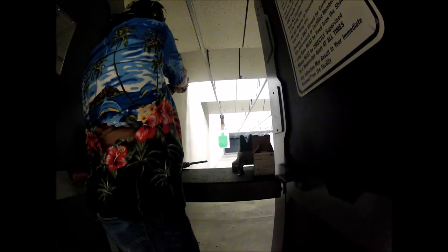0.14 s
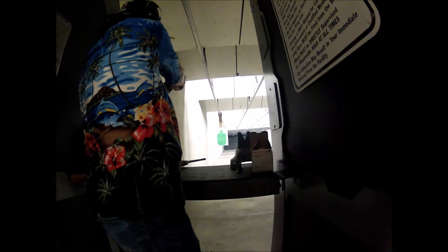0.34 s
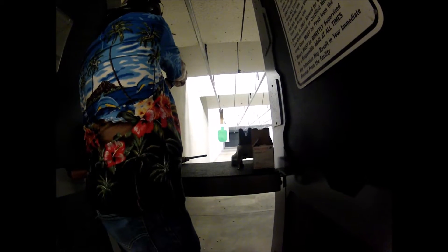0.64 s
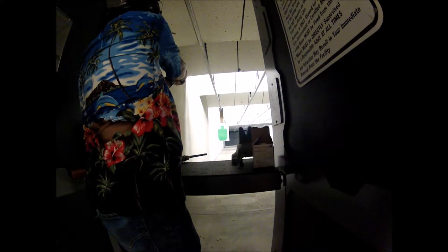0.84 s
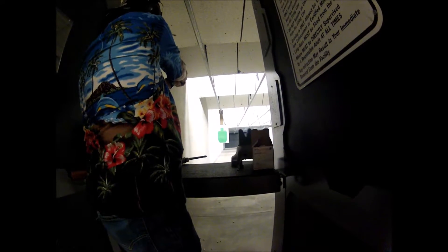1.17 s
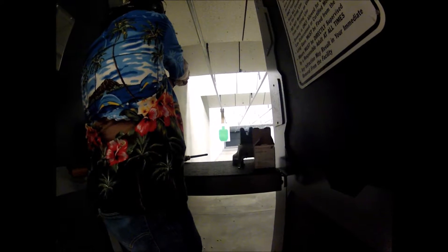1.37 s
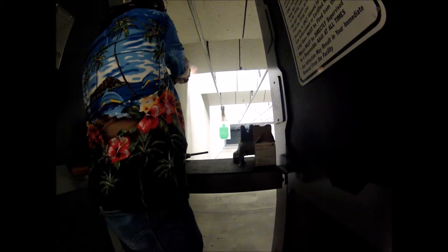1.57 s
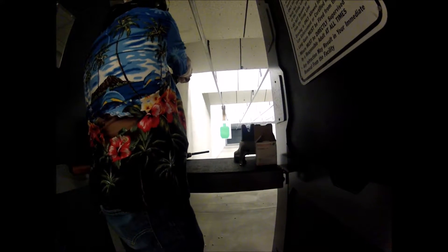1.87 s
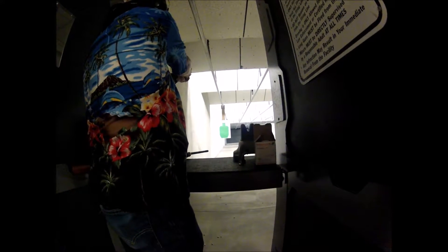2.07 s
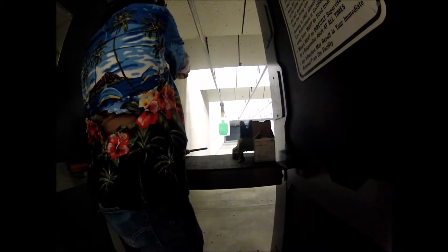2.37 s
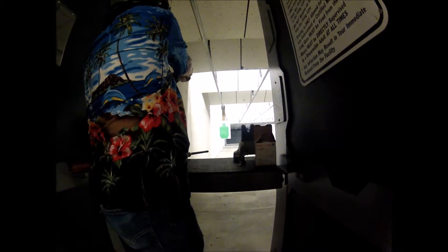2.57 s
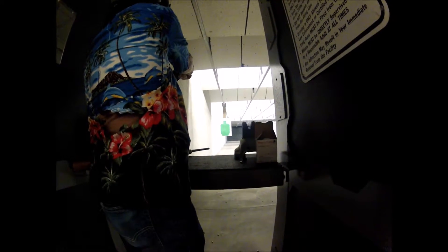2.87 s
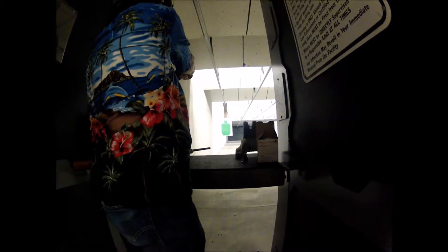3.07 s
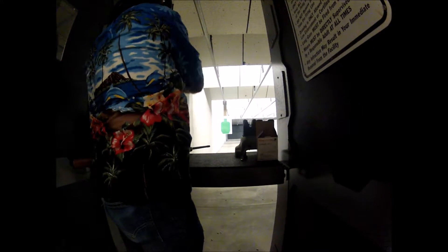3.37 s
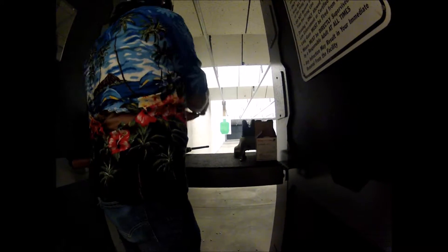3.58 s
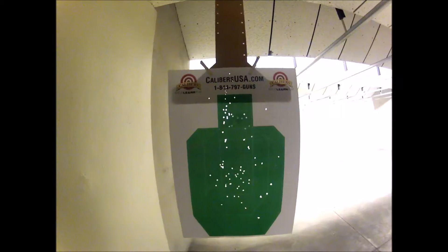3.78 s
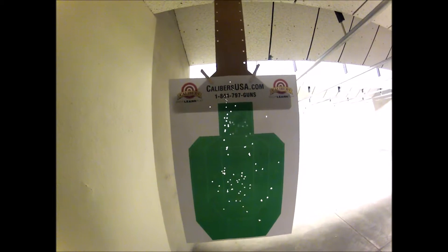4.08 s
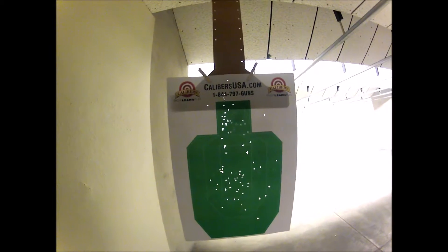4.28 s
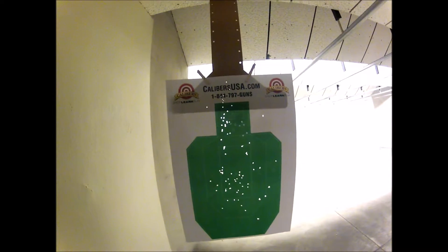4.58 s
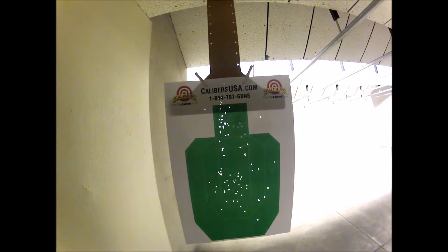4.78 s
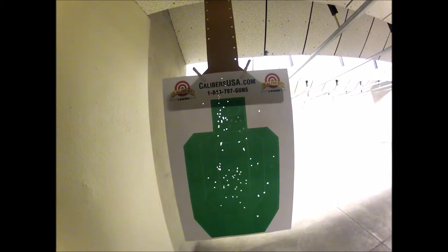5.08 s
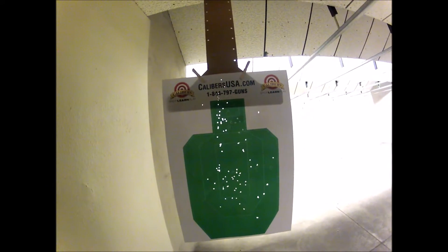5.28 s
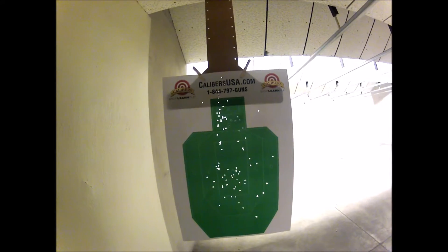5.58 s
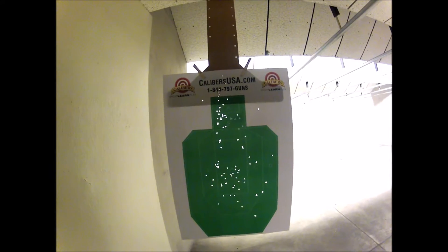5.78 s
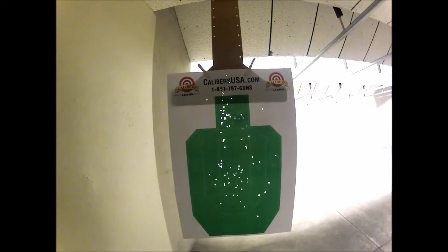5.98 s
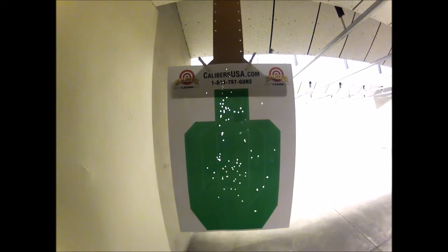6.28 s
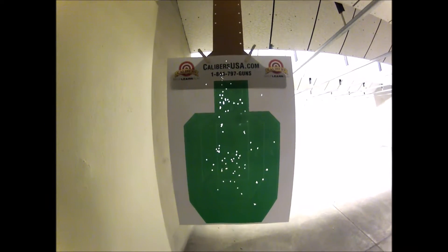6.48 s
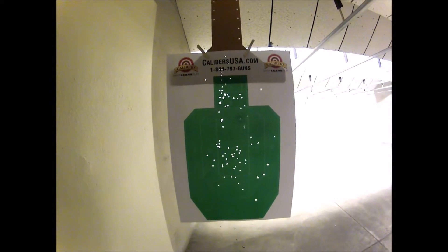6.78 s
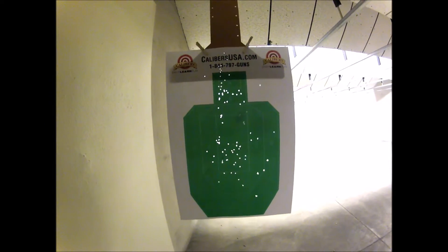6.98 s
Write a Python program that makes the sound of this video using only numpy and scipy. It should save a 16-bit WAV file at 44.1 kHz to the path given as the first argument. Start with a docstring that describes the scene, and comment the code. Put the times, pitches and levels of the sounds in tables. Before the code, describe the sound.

The sound opens on the fading echo of a gunshot in an indoor range. A small-calibre gun fires close by in a booth: four quick shots at about 0.4, 0.6, 0.9 and 1.1 seconds, one at 1.6, then four more between 2.1 and 2.7. Each is a sharp, gritty crack that overloads the microphone; the level ducks, then the hall's ringing echo swells back. A light, high metal clink comes at 3.3 seconds. At about 3.8 the echo cuts off as the listening position jumps far down the lane. The ventilation, present throughout, is left alone: a low rumble and fan hum, with a faint hiss that swells twice between 5 and 5.7 seconds. A fainter clink sounds just after 6. Two distant shots follow at 6.2 and 6.8 seconds, the second louder, each a long, dull roar with a booming echo.

```python
"""Gunshots at an indoor range

A rimfire gun fires nine shots in a booth, over the tail of an earlier one. Each overloads a small
camera, which turns itself down, then lets the hall's echo swell back. Then the scene jumps far down
the lane, where two shots arrive as long, dull roars. Ventilation runs throughout; metal clinks twice."""
import sys
import numpy as np
from scipy import signal
from scipy.fft import rfft, irfft
from scipy.io import wavfile

SR = 44100
rng = np.random.default_rng(int(sys.argv[2]) if len(sys.argv) > 2 else 0)


def dump_mix(stems):
    """Bounce the given channels to the path in sys.argv[1] as a 16-bit WAV at rate SR."""
    frames = np.atleast_2d(stems).T  # one column per channel
    limited = np.clip(frames, -1, 1)  # hard clip at full scale
    pcm = np.round(limited * 32767).astype(np.int16)
    wavfile.write(sys.argv[1], SR, pcm)


N = 314852
T = np.arange(N) / SR
FREQS = np.arange(N // 2 + 1) * SR / N


def from_db(db):
    """Turn decibels into a number to multiply by."""
    return 10 ** (np.asarray(db) / 20)


def delayed(x, s):
    """The sound x started at s seconds, which may be negative."""
    return np.interp(np.arange(N) - round(s * SR), np.arange(N), x, left=0, right=0)


def rising(s):
    """A soft start that takes about s seconds."""
    return 1 - np.exp(-(T / s) ** 2)


def dying(t60):
    """A fade that falls 60 dB in t60 seconds."""
    return np.exp(-np.log(1000) * T / t60)


def hump(centre_s, width_s):
    """A bell-shaped rise and fall of height 1."""
    return np.exp(-((T - centre_s) / width_s) ** 2)


def low_pass(x, hz, order):
    """Soften everything above hz; a higher order cuts more sharply."""
    return irfft(rfft(x) / np.sqrt(1 + (FREQS / hz) ** (2 * order)), N)


def drift(rate_hz):
    """A slow random wander with a spread of 1."""
    slow = low_pass(rng.standard_normal(N), rate_hz, order=2)
    return slow / slow.std()


def noise(colour, resonances=()):
    """Noise of strength 1; its colour says how loud each pitch is, and resonances add bumps or dips."""
    hz, db = np.transpose(colour)
    octave = np.log2(FREQS + 1)
    octaves_outside = np.abs(octave - np.clip(octave, np.log2(hz[0]), np.log2(hz[-1])))
    shape_db = np.interp(octave, np.log2(hz), db) - 40 * octaves_outside
    for centre, width, lift in resonances:
        shape_db += lift / (1 + (2 * (FREQS - centre) / width) ** 2)
    x = irfft(rfft(rng.standard_normal(N)) * from_db(shape_db), N)
    return x / x.std()


def struck(tones):
    """Fading pure tones, all started by one blow."""
    return sum(from_db(db) * dying(t60) * np.sin(2 * np.pi * hz * T) for hz, db, t60 in tones)


# tones of the booth's side walls: f/Hz, level/dB, time to fade 60 dB/s
PARTITION_TONES = [(351, -0.5, 0.52), (459, 15, 0.038), (581.5, 11.5, 0.13), (1290, 7, 0.035),
                   (2162, 16.5, 0.029), (3220, 4, 0.044)]
def muzzle_blast(hz=561, rise_s=0.0014, t60=0.021, blast_db=24.5):
    """The pressure wave slaps between the booth's side walls for a few cycles and sets them ringing."""
    wave = from_db(blast_db) * rising(rise_s) * dying(t60) * np.sin(2 * np.pi * hz * T)
    walls = rising(0.002) * struck(PARTITION_TONES)
    return -(wave + walls)


def low_thump(peak_s, thump_db):
    """A short, low thump comes with each overloaded shot."""
    return -from_db(thump_db) * (T / peak_s * np.exp(1 - T / peak_s)) ** 2


def reflections(early_db, early_t60, hall_db, hall_t60, build_s):
    """A room's loudness over time: the booth's echoes die fast, the hall's slowly."""
    early = from_db(early_db) * dying(early_t60)
    hall = from_db(hall_db) * dying(hall_t60)
    return rising(build_s) * np.hypot(early, hall)   # their powers add


# tones that ring longest in the booth: f/Hz, level/dB
LINGERING_TONES = [(575, 1.5), (657, 1), (813, -3), (931, -5.5), (1147, -12), (1464, -10), (1798, -10.5),
                   (2051, -11), (2121, -11), (2326, -17), (2611, -10.5), (2950, -11)]
def booth_ring(ring_db, t60, width_hz):
    """A few narrow bands of sound outlast the other echoes."""
    power = sum(from_db(2 * db) / (1 + (2 * (FREQS - hz) / width_hz) ** 4) for hz, db in LINGERING_TONES)
    ring = irfft(rfft(rng.standard_normal(N)) * np.sqrt(power), N)
    return from_db(ring_db) * dying(t60) * ring / ring.std()


# colours of the hall's dull and bright echoes at the booth: f/Hz, level/dB
BOOTH_BOOM_COLOUR = [(18, -54), (30, -34), (85, -12.5), (113, -12), (157, -9), (215, -4), (248, -3),
                     (310, -1), (424, -0.5), (513, -6), (650, -4), (797, -11.5), (934, -17.5), (1030, -24),
                     (1300, -27.5), (1690, -55), (2860, -120)]
BOOTH_CRACK_COLOUR = [(530, -29), (900, -4.5), (1090, -13), (1660, -9), (1780, -9), (1940, -9), (2100, -8),
                      (3940, -7), (4840, -13.5), (6000, -22), (7800, -63.5), (13200, -120)]
# pitches the booth lifts or lowers: f/Hz, width/Hz, lift/dB
BOOTH_RESONANCES = [(368, 59, 3), (467, 16, 3), (564, 160, 1.5), (683, 135, 4), (2250, 37, -1)]
def booth_reverberation(treble_t60=4.5, flutter_db=15, flutter_rise_s=0.0035, flutter_t60=0.068):
    """The crack bounces between the side walls, then echoes die away; air swallows the treble first."""
    boom = reflections(early_db=12, early_t60=0.25, hall_db=3, hall_t60=1.754, build_s=0.0011)
    crack = reflections(early_db=3, early_t60=0.42, hall_db=-10.5, hall_t60=2.35, build_s=0.0028)
    flutter = from_db(flutter_db) * rising(flutter_rise_s) * dying(flutter_t60)
    bright = noise(BOOTH_CRACK_COLOUR, BOOTH_RESONANCES)
    dull = low_pass(bright, hz=2750, order=3)
    darkening = dull + (bright - dull) * dying(treble_t60)
    ring = booth_ring(ring_db=-18, t60=4.05, width_hz=34)
    return boom * noise(BOOTH_BOOM_COLOUR, BOOTH_RESONANCES) + np.hypot(crack, flutter) * darkening + ring


def wall_echo(lag_s, width_s, echo_db):
    """A wall throws the blast back as a short, dull thud."""
    return from_db(echo_db) * hump(lag_s, width_s) * noise(BOOTH_BOOM_COLOUR, BOOTH_RESONANCES)


# colour of the gas bursting from the barrel: f/Hz, level/dB
GAS_COLOUR = [(1100, -15), (1350, 2.5), (1800, -10), (2150, -2), (2700, -5.5), (3600, 2.5), (4600, 1),
              (5600, -13)]
# shots in the booth: t/s, level/dB, extra thump/dB, extra slap off the near wall/dB
BOOTH_SHOTS = [(-.27, 0.5, 0, 0), (0.3701, -2, 9.5, -5.5), (0.6434, -2, 4, -0.5), (0.8743, -3.5, -15, 0.5),
               (1.1163, -2, -1, 0), (1.6343, -1.5, 7, 1.5), (2.0678, -2.5, 10, -1.5), (2.306, -2, -12, 1),
               (2.5282, 0.5, -15, 0.5), (2.7422, 1.5, -19, 0.5)]
def booth_shots(gas_db=18.5, gas_t60=0.043, gas_rise_s=0.0011):
    """Gun and listener stay put, so each shot wakes the same echoes, but with a new burst of gas."""
    bang = muzzle_blast() + booth_reverberation() + wall_echo(lag_s=0.05, width_s=0.0063, echo_db=6.5)
    thump = low_thump(peak_s=0.0015, thump_db=10.5)
    slap = wall_echo(lag_s=0.006, width_s=0.0024, echo_db=19)
    burst = from_db(gas_db) * rising(gas_rise_s) * dying(gas_t60)
    rush = noise(GAS_COLOUR)
    out = np.zeros(N)
    for s, db, thump_db, slap_db in BOOTH_SHOTS:
        gas = burst * np.roll(rush, rng.integers(N))
        shot = bang + gas + from_db(thump_db) * thump + from_db(slap_db) * slap
        out += from_db(db) * delayed(shot, s)
    return out


# colours of the moving air's rumble and hiss: f/Hz, level/dB
RUMBLE_COLOUR = [(12, -38), (20, -15.5), (87, -2.5), (105, -7.5), (119, -8.5), (184, -9.5), (204, -2),
                 (235, 0), (270, -7), (357, -10), (433, -14), (718, -16), (826, -23.5), (1300, -42),
                 (1690, -68), (2860, -120)]
HISS_COLOUR = [(590, -13), (1000, -27), (1140, -7), (1640, -5.5), (2040, -5.5), (2320, -4), (3010, -2),
               (4790, -12.5), (6000, -24), (7800, -63), (13200, -120)]
# pitches the ducts lift: f/Hz, width/Hz, lift/dB
DUCT_RESONANCES = [(80, 5.7, 1.5), (228, 9.4, 1)]
# moments when the hiss grows louder: t/s, width/s, lift/dB
HISS_SWELLS = [(5.13, 0.21, 5), (5.56, .18, 6)]
def ventilation(rumble_db=-33, hiss_db=-54, fan_hz=245, fan_db=-37, waver_hz=5, waver_db=0.7):
    """A fan drones; air rumbles in the ducts and hisses, swelling twice; the level wavers slightly."""
    pitch_hz = fan_hz + waver_hz * drift(rate_hz=7.65)
    fan = from_db(fan_db) * np.sin(2 * np.pi * np.cumsum(pitch_hz) / SR)
    rumble = from_db(rumble_db + waver_db * drift(rate_hz=8.7)) * noise(RUMBLE_COLOUR, DUCT_RESONANCES)
    lift_db = sum(db * hump(s, width_s) for s, width_s, db in HISS_SWELLS)
    hiss = from_db(hiss_db + lift_db + waver_db * drift(rate_hz=16)) * noise(HISS_COLOUR)
    return rumble + hiss + fan


# taps on small pieces of metal: t/s, level/dB
METAL_TAPS = [(3.333, -37), (6.057, -44.5)]
# tones of the metal: f/Hz, level/dB, time to fade 60 dB/s
METAL_TONES = [(3750, -11, .04), (4150, -2, .04), (4600, 0, 0.037), (4850, -2, .06), (5030, -5, 0.11)]
def clinks():
    """A light tap makes metal ring with a few high tones."""
    return sum(from_db(db) * delayed(struck(METAL_TONES), s) for s, db in METAL_TAPS)


def swell(level_db, attack_s, softness, hold_s, t60):
    """A far shot's loudness over time: echoes pile up, hold while more arrive, then die away."""
    fade = from_db(-60 * np.maximum(T - hold_s, 0) / t60)
    return from_db(level_db) * (1 - np.exp(-T / attack_s)) ** softness * fade


# colours of the hall's dull and bright echoes down the lane: f/Hz, level/dB
LANE_BOOM_COLOUR = [(18, -51), (30, -19), (60, -14.5), (123, -10.5), (182, -6.5), (235, 1), (290, -5),
                    (351, 0.5), (426, -7), (469, -6), (647, -6.5), (810, -18), (952, -28), (1150, -47),
                    (1400, -35), (1820, -38), (3080, -120)]
LANE_CRACK_COLOUR = [(590, 5.5), (1000, 1), (1160, -6.5), (1420, -12.5), (1890, -10), (2160, -9),
                     (2900, -7.5), (3630, -11.5), (5010, -15), (6000, -24.5), (7800, -61), (13200, -120)]
# pitches the lane lifts or lowers: f/Hz, width/Hz, lift/dB
LANE_RESONANCES = [(247, 22, -4), (352, 21, 0.5), (2820, 350, 3)]
# low tones of the lane, woken by the heavy echo: f/Hz, level/dB, time to fade 60 dB/s
LANE_TONES = [(245.6, -1, 0.83), (334, -3, 1), (356, -1.5, 1)]
# shots heard down the lane: t/s, level/dB, crack delay/s, echo delay/s, echo level/dB
LANE_SHOTS = [(6.202, 1, .016, 0.102, -11), (6.774, 5.5, .006, .085, -9)]
def lane_shots(echo_rise_s=0.0028, scatter_db=-9, scatter_t60=0.7):
    """Far from the gun all sound has bounced: a roar swells, then a heavy echo makes the lane boom."""
    boom_shape = swell(level_db=-10, attack_s=0.037, softness=0.83, hold_s=0.23, t60=2.2)
    crack_shape = swell(level_db=-19, attack_s=0.018, softness=4.2, hold_s=0.079, t60=1.4)
    ring = struck(LANE_TONES)
    out = np.zeros(N)
    for s, db, crack_lag, echo_lag, echo_db in LANE_SHOTS:
        boom = boom_shape * noise(LANE_BOOM_COLOUR, LANE_RESONANCES)
        crack = crack_shape * noise(LANE_CRACK_COLOUR, LANE_RESONANCES)
        scatter = from_db(scatter_db) * dying(scatter_t60) * noise(LANE_BOOM_COLOUR, LANE_RESONANCES)
        echo = from_db(echo_db) * rising(echo_rise_s) * (ring + scatter)
        shot = boom + delayed(crack, crack_lag) + delayed(echo, echo_lag)
        out += from_db(db) * delayed(shot, s)
    return out


def scene(jump_s=3.779):
    """First the booth, then the far end of the lane; the ventilation runs throughout."""
    shots = np.where(T < jump_s, booth_shots(), lane_shots())
    return (shots + ventilation() + clinks())[None]


def gain_control(x, limit_db=-8, down_db_per_s=1950, up_db_per_s=48, start_cut_db=15, window_s=0.0034):
    """The volume slides down quickly when the sound is too loud, then creeps back up."""
    keep = np.exp(-1 / (window_s * SR))
    power = signal.lfilter([1 - keep], [1, -keep], x ** 2)
    excess_db = np.maximum(10 * np.log10(power + 1e-12) - limit_db, 0)
    excess_db[0] = start_cut_db   # still turned down by the shot before
    held_db = np.maximum.accumulate(excess_db + up_db_per_s * T) - up_db_per_s * T
    cut_db = np.minimum.accumulate(held_db - down_db_per_s * T) + down_db_per_s * T
    return x * from_db(-cut_db)


def overload(x, ceiling, sharpness):
    """The amplifier cannot pass its ceiling, so it flattens the peaks."""
    return x / (1 + np.abs(x / ceiling) ** sharpness) ** (1 / sharpness)


def sample_and_hold(x, rate_hz=12000):
    """A slow converter holds each value, which mirrors the sound into a gritty treble."""
    slow = signal.resample_poly(x, rate_hz, SR)
    steps = np.repeat(slow, 4)
    return signal.resample_poly(steps, SR, 4 * rate_hz)[:N]


def record(dry):
    """The camera turns loud sounds down, flattens their peaks, adds grit and cuts the highest treble."""
    flattened = overload(gain_control(dry[0]), ceiling=0.74, sharpness=8)
    gritty = sample_and_hold(low_pass(flattened, hz=6260, order=14))
    return low_pass(np.clip(gritty, -1, 1), hz=15350, order=150)[None]


dry = scene()
out = record(dry)
dump_mix(out)
```